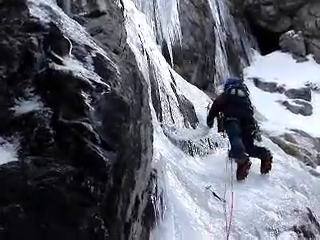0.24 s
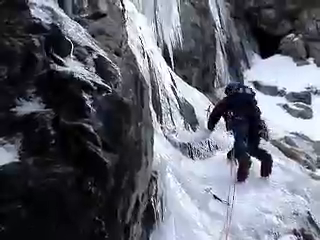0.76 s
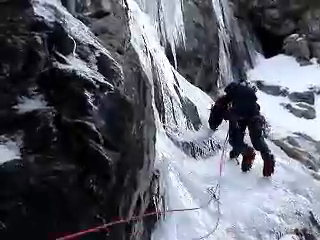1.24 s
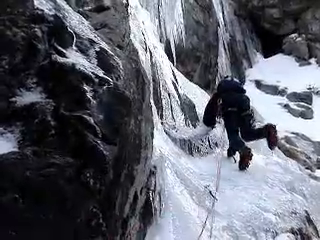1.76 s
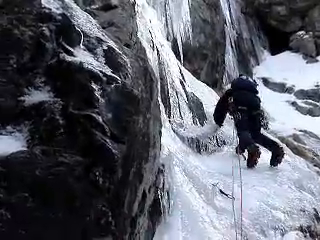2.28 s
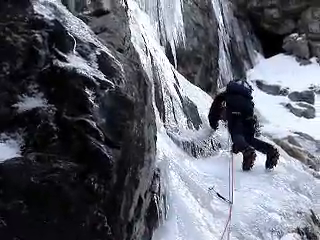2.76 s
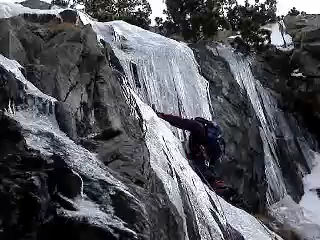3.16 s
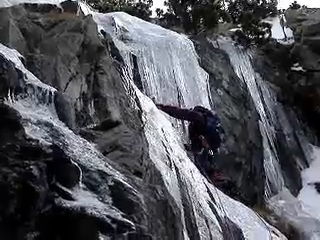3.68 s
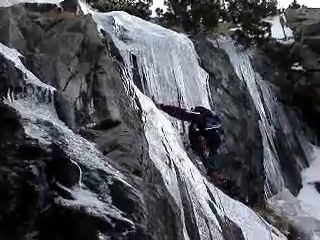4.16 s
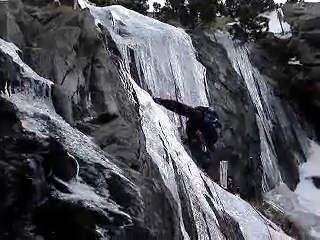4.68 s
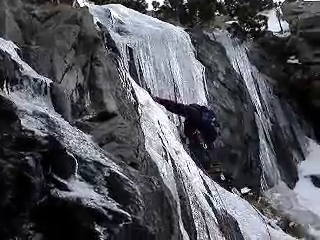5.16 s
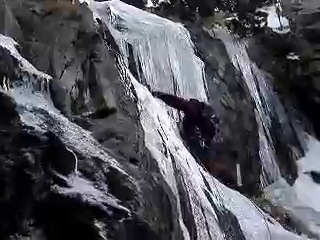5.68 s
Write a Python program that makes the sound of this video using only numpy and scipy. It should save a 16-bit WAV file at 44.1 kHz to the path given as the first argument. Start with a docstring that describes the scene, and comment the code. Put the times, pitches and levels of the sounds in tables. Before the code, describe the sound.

Picks and crampons crunch into hollow ice, then broken icicles tumble down in knocking chunks and a hiss of splinters.

```python
"""Ice climbing and falling icicles

A climber works up a frozen waterfall in a rocky gully: picks and crampons crunch into the ice,
the hollow sheet booms, gear clinks, something trickles softly and wind nudges the microphone.
The sound drops out briefly, then icicles tumble down the slope, bursting into knocking chunks and
a hissing slide of splinters. Each crunch is a swarm of tiny cracks, echoed by the rock walls."""
import sys
import numpy as np
from scipy import signal
from scipy.fft import rfft, irfft
from scipy.io import wavfile
from scipy.ndimage import uniform_filter1d

SR = 44100
rng = np.random.default_rng(int(sys.argv[2]) if len(sys.argv) > 2 else 0)


def persist_wave(psi):
    """Save psi, clipped to +-1, as 16-bit WAV."""
    counts = np.round(np.clip(psi, -1, 1) * 32767).astype(np.int16)
    wavfile.write(sys.argv[1], SR, np.atleast_2d(counts).T)


N = 261513

# Picks and crampons biting in. "Hollow" is the low note of the ice, "ring" its high note.
# (time [s], relative level [dB], brightness [dB], hollow [Hz], ring [Hz], crumbling time [s])
BLOWS = [(0.152, -12.5, -4.5, 380, 2880, 0.029), (0.231, -23.5, -6, 686, 2540, 0.033),
         (0.327, -48, 22.5, 450, 6000, 0.01), (0.546, -36, 12.5, 384, 4400, 0.0041),
         (0.645, -40, 6, 596, 5650, 0.012), (0.888, -32, -5, 385, 1600, 0.03),
         (1.119, -38, 2, 990, 4100, 0.031), (1.265, -22, -3.5, 376, 3200, 0.023),
         (1.511, -33.5, 0.5, 420, 2860, 0.043), (1.604, -43.5, 20.5, 423, 5540, 0.023),
         (1.783, -36.5, 16, 390, 5140, 0.0038), (1.865, -41, -16, 750, 1900, 0.028),
         (1.991, -30.5, -9, 1500, 2230, 0.031), (2.022, -20, 0, 338, 3050, 0.025),
         (2.23, -29, 6, 918, 3630, 0.028), (2.367, -32.5, -1.5, 960, 2490, 0.054),
         (2.564, -34.5, 14, 920, 4500, 0.0033), (2.682, -29, -2.5, 1430, 2150, 0.042),
         (2.768, -33.5, -3.5, 738, 2060, 0.033)]
# The tone of their crunch: (frequency [Hz], level [dB])
BLOW_TONE = [(59, -80), (100, -25), (330, 4.5), (467, -6.5), (600, 2), (1140, 4.5), (1810, 2.5),
             (2130, -3.5), (3040, -13.5), (3590, -6), (4610, -8), (12800, -25), (14500, -36)]
# The notes of a steel pick: (pitch [Hz], relative level [dB], time to fade by 60 dB [s])
PICK_NOTES = [(1900, -24, 0.27), (3060, -5, 0.14), (4020, -1, 0.22), (4670, 1, 0.15), (6140, -15, 0.098)]
# The low notes of the ice sheet; wider ones die sooner: (pitch [Hz], width [Hz], relative level [dB])
SHEET_NOTES = [(135.6, 21, 5.5), (160, 16.5, 6), (207, 20, 2.5), (333, 49, 9)]


def climbing_blows():
    """Steel points ring as they crush into the hollow ice sheet, which booms."""
    out, t = np.zeros(N), np.arange(SR // 2) / SR
    boom = sum(from_db(db) * np.sin(2 * np.pi * hz * t) * np.exp(-np.pi * width_hz * t)
               for hz, width_hz, db in SHEET_NOTES)
    boom *= 1 - np.exp(-t / 0.026)   # the whole sheet takes a moment to get moving
    for s, level_db, bright_db, hollow_hz, ring_hz, crumble_s in BLOWS:
        levels = band_levels("blow", level_db, bright_db, hollow_hz)
        thud_db, _, crack_db, _ = levels
        # harder blows crush the ice, so the first snap grows less than the crack
        crunch = shatter(levels, hollow_hz, ring_hz, crumble_s, BLOW_TONE, fade_s=0.14,
                         snap_db=0.54 * crack_db - 2.5, snaps_per_s=3700, spread_db=2,
                         hollow_db=3.5, ring_db=3.5, shard_db=-13, knock_db=-15, clink_db=2.5)
        steel = sum(ping(hz * rng.uniform(1, 1.015), crack_db + db - 4.5, fade_s)
                    for hz, db, fade_s in PICK_NOTES)
        add(out, s, crunch)
        add(out, s, steel)
        add(out, s + 0.011, from_db(thud_db + 3) * boom)
    return from_db(-6) * out


# Chunks breaking off and landing: (time [s], relative level [dB], brightness [dB],
# hollow [Hz], hollow level [dB], ring [Hz], ring level [dB], crumbling time [s])
FALLS = [(3.201, -34, 11.5, 1500, 19, 3340, -6, 0.038), (3.331, -20, -3, 1320, 12, 623, 10, 0.032),
         (3.41, -25.5, -3, 690, 18, 2280, 7, .022), (3.48, -28, -7, 1330, 18, 2480, 1, 0.017),
         (3.559, -26.5, -7, 1490, 13, 2400, 9, 0.028), (3.635, -23.5, 3, 1240, -7, 3280, 6, 0.021),
         (3.727, -24, 1, 895, 7, 3120, 14.5, 0.029), (3.799, -28.5, -1, 1200, -14, 2660, 6, 0.011),
         (3.936, -27.5, -4, 590, 15, 3500, 11, 0.043), (3.962, -26, -4.5, 870, 17, 3620, 8, 0.03),
         (4.038, -25, -3.5, 1180, 7, 2284, 12, 0.029), (4.051, -24.5, 4.5, 570, 7, 3430, 14.5, 0.04),
         (4.098, -24, 0.5, 1190, 19, 2160, 7, 0.063), (4.128, -22.5, -3, 1280, 19, 2200, 5, 0.056),
         (4.248, -26.5, -4, 600, 11, 1790, 5, 0.03), (4.409, -31.5, -13, 726, -13, 1070, 15, 0.027),
         (4.479, -25.5, -2, 1210, -5, 3180, 8, 0.018), (4.544, -39, 32, 1360, 6, 4390, 4, 0.013),
         (4.64, -27.5, -1, 1220, 4, 3430, 13, 0.045), (4.697, -22, -5, 980, 11, 1560, 9, 0.032),
         (4.76, -27, -9, 1290, -6, 2260, 6, .03), (4.801, -17, 2.5, 1770, 6, 2830, 0, 0.028),
         (4.862, -22.5, 5.5, 1330, -7, 4500, 7.5, 0.035), (4.904, -23.5, 4, 517, 6, 4120, 3, 0.047),
         (5.038, -24, -4, 1390, -2, 2960, 4, 0.033), (5.06, -19, 1.5, 496, 5, 1930, 2, 0.036),
         (5.137, -25, 3, 590, 2, 2580, 14, 0.04), (5.165, -20.5, -2.5, 423, -5, 2060, -5, 0.031),
         (5.179, -18.5, 6, 1090, 20, 3805, 11.5, 0.017), (5.238, -19.5, 13, 845, 11, 3680, 2, 0.0091),
         (5.255, -14, 1.5, 1490, 2, 3450, -4, 0.019), (5.337, -20.5, 2.5, 930, 1, 4350, 9, 0.014),
         (5.355, -21, 9.5, 970, 12, 4960, 5, 0.018), (5.5, -28.5, -2, 830, 4, 3020, 7, 0.033),
         (5.569, -23.5, 6, 900, 6, 4070, 9, .006), (5.601, -11, -6, 800, 17.5, 1430, 11, 0.015),
         (5.621, -21.5, 13, 800, -8, 2140, 4, 0.0087), (5.698, -14, 4.5, 850, 11, 4050, 0, 0.026),
         (5.82, -24.5, 6, 850, 12, 1670, 8, 0.0099)]
# The tone of their crunch: (frequency [Hz], level [dB])
FALL_TONE = [(59, -60), (100, -11), (134, -35), (175, -7), (255, -11), (308, -4), (693, -8.5), (786, -9),
             (1120, -8.5), (4070, -12), (8800, -15), (10400, -19), (14500, -14)]


def falling_ice():
    """Broken icicles burst on the slope; some ring hollow, others only crunch."""
    out = np.zeros(N)
    for s, level_db, bright_db, hollow_hz, hollow_db, ring_hz, ring_db, crumble_s in FALLS:
        levels = band_levels("fall", level_db, bright_db, hollow_hz)
        _, _, crack_db, _ = levels
        burst = shatter(levels, hollow_hz, ring_hz, crumble_s, FALL_TONE, fade_s=0.17,
                        snap_db=crack_db + 8.5, snaps_per_s=2400, spread_db=3, hollow_db=hollow_db,
                        ring_db=ring_db, shard_db=-9, knock_db=hollow_db - 4, clink_db=ring_db - 4)
        add(out, s, burst)
    return from_db(-5) * out


# The four bands of an impact, from low to high: thud, crunch, crack and spray.
# (level in a blow [dB], level in a fall [dB], gain from brightness [dB per dB])
IMPACT_BANDS = [(-7.5, -2.5, -0.68), (-4, 1, -0.3544), (-0.5, 0.5, 0.4037), (-3, -7.5, 0.7332)]
BIG_BLOCK_HZ, THUD_DB_PER_OCTAVE = 543, -6.5


def band_levels(kind, level_db, bright_db, hollow_hz):
    """Bright impacts favour the high bands; smaller blocks sound higher and thud less."""
    blow_db, fall_db, tilt = np.transpose(IMPACT_BANDS)
    levels = level_db + (blow_db if kind == "blow" else fall_db) + bright_db * tilt
    levels[0] += THUD_DB_PER_OCTAVE * np.log2(hollow_hz / BIG_BLOCK_HZ)
    return levels


# The borders of those four bands: (frequency [Hz])
BAND_EDGES_HZ = [60, 700, 2500, 6000, 15000]


def shatter(levels, hollow_hz, ring_hz, crumble_s, tone, fade_s, snap_db, snaps_per_s, spread_db,
            hollow_db, ring_db, shard_db, knock_db, clink_db):
    """Ice breaks with a snap, a knock, a clink and a swarm of tiny cracks that soon fades."""
    thud_db, _, crack_db, _ = levels
    t = np.arange(SR // 3) / SR
    size = len(t) + 1024   # extra samples let the filters settle
    cracks = tiny_snaps(size, snaps_per_s, spread_db)
    # the block rings hollow; its fragments collide, each at a pitch of its own
    block = from_db(hollow_db) * resonance(cracks, hollow_hz, 170)
    block += from_db(ring_db) * resonance(cracks, ring_hz, 400)
    pitches = np.geomspace(900, 9000, 14) * np.exp(rng.normal(0, 0.1196, size=14))
    shards = sum(resonance(tiny_snaps(size, 180, spread_db), hz, 49) for hz in pitches)
    swarm = shape_tone(unit_level(cracks + block) + from_db(shard_db) * unit_level(shards), tone)
    crumble = np.zeros(len(t))
    band_fades_s = fade_s * np.linspace(0.83, 0.7, len(levels))   # the thud outlasts the spray
    for low_hz, high_hz, db, band_fade_s in zip(BAND_EDGES_HZ, BAND_EDGES_HZ[1:], levels, band_fades_s):
        band = even_out(filtered(swarm, [low_hz, high_hz], "band", order=3), window=700)
        spurts_db = 0.96 * wander(196, len(t))   # coarse and fine pieces give way separately
        fade_db = -60 * np.maximum(t - crumble_s, 0) / band_fade_s
        crumble += from_db(db + spurts_db + fade_db) * band[-len(t):]
    first_push = 1 + 0.3 * np.exp(-t / 0.005)
    spreading = 1 - np.exp(-t / 0.00071)   # the cracks take a moment to spread
    snap = filtered(rng.standard_normal(len(t)) * np.exp(-t / 0.001), [700, 5500], "band")
    knock_shape = (1 - np.exp(-t / 0.0057)) * np.exp(-t / 0.0071)
    knock = from_db(thud_db + knock_db) * np.sin(2 * np.pi * hollow_hz * t) * knock_shape
    clink = from_db(crack_db + clink_db) * np.sin(2 * np.pi * ring_hz * t) * np.exp(-t / 0.0082)
    return crumble * first_push * spreading + with_peak(snap, snap_db) + knock + clink


# Hard lumps knocking: (time [s], peak level [dB], pitch [Hz])
KNOCKS = [(0.175, -14, 396), (1.513, -24.5, 420), (1.738, -24, 636), (2.029, -18, 224), (2.548, -29, 520),
          (2.685, -26, 700), (3.044, -22, 2000), (3.077, -18.5, 1780), (3.097, -16, 1770),
          (3.116, -7.5, 1830), (3.34, -8, 598), (3.862, -17, 382), (3.872, -14, 710), (4.007, -28, 770),
          (4.107, -20.5, 454), (4.128, -12, 1180), (4.266, -19, 557), (4.351, -16, 850), (4.42, -22.5, 463),
          (4.696, -21, 1050), (4.801, -6.5, 1230), (4.911, -17.5, 383), (5.008, -17, 640),
          (5.063, -16, 340), (5.079, -8, 1980), (5.147, -9, 2500), (5.166, -20, 435), (5.199, -19, 440),
          (5.238, -7, 820), (5.275, -21, 615), (5.427, -19.5, 790)]
# The notes of one lump: (multiple of its pitch [ratio], relative level [dB])
LUMP_NOTES = [(1, 0.5), (1.44, -6.5), (2.13, -3.5), (3.2, -14.5), (4.9, -32)]


def knocking_lumps():
    """A lump rings briefly with a few clashing notes, bounces once and sheds a little grit."""
    out, t = np.zeros(N), np.arange(SR // 8) / SR
    for s, peak_db, hz in KNOCKS:
        hits = np.zeros(len(t))
        hits[0] = rng.choice([-1, 1])
        bounce_s = 0.011 * rng.uniform(0.6, 1.4)
        hits[int(bounce_s * SR)] = from_db(-13)
        ring = np.zeros(len(t))
        for multiple, db in LUMP_NOTES:
            note_hz = hz * multiple * (1 + 0.075 * rng.standard_normal())
            fade_s = 18 / hz / np.sqrt(multiple)   # higher notes die sooner
            ring += rng.choice([-1, 1]) * ping(note_hz, db + 2 * rng.standard_normal(), fade_s)[:len(t)]
        knock = filtered(signal.fftconvolve(ring, hits)[:len(t)], hz / 2, "high", order=4)
        grit = unit_level(filtered(rng.standard_normal(len(t)), [700, 5000], "band"))
        knock += from_db(-20) * grit * np.exp(-t / 0.003)
        add(out, s, with_peak(knock, peak_db))
    return out


# Single sharp ticks: (time [s], relative level [dB], pitch [Hz], contact time [s])
TICKS = [(0.157, -4, 2900, 0.0015), (0.175, -10, 3000, 0.00087), (0.777, -23, 3400, .002),
         (1.267, -26, 2280, 0.00089), (1.337, -21, 1400, .001), (1.5142, -25.5, 3460, 0.00065),
         (1.604, -20, 6000, .0015), (1.624, -21, 5650, 0.0025), (1.783, -21, 4970, .002),
         (1.991, -17, 1940, 0.00054), (2.026, -14, 1680, .003), (2.028, -12.5, 2960, 0.002),
         (2.232, -12.5, 6160, .002), (2.369, -23.5, 3270, 0.0025), (2.684, -18, 2180, 0.0067),
         (3.113, -7, 3740, 0.00022), (3.1995, -14, 3130, 0.0011), (3.7274, -11.5, 2430, 0.0019),
         (3.7444, -11, 2900, 0.0016), (4.388, -17, 2970, .003), (4.606, -14.5, 1390, 0.00035),
         (4.699, -11, 1900, 0.0023), (4.807, -7, 2440, .001), (4.948, -17, 4590, .0005),
         (5.064, -6, 1850, 0.00069), (5.239, -16, 2200, 0.00069), (5.258, -7, 4100, .0005),
         (5.553, -10, 3370, 0.00054), (5.6021, -4, 1290, 0.00076), (5.609, -3, 820, 0.0013),
         (5.697, -8, 3600, 0.0015)]


def sharp_ticks():
    """A hard little contact rings briefly; the longer it grinds, the fuller it sounds."""
    out, t = np.zeros(N), np.arange(SR // 10) / SR
    for s, db, hz, contact_s in TICKS:
        fade = np.exp(-t / contact_s) + from_db(-18) * np.exp(-t / 0.006)
        grind = rng.standard_normal(len(t)) * fade
        tick = resonance(grind, hz, hz / 2.8) + from_db(-49) * filtered(grind, [500, 8000], "band")
        add(out, s, with_peak(tick, db - 0.5))
    return out


# Low thumps: (time [s], peak level [dB])
THUMPS = [(0.159, -22), (2.032, -30), (3.113, -28), (3.768, -34), (4.861, -27), (5.061, -25.5),
          (5.234, -28), (5.275, -26.5), (5.351, -27.5), (5.606, -25), (5.696, -26)]


def impact_thumps():
    """Dull low thumps come with the loud ice impacts."""
    out, t = np.zeros(N), np.arange(SR // 10) / SR
    thump = filtered(np.exp(-t / 0.00033), [25, 170], "band")
    for s, peak_db in THUMPS:
        add(out, s, with_peak(thump, peak_db))
    return out


# Icicle stubs chattering as they are hit: (time [s], level [dB], pitch [Hz])
ICICLE_CHATTER = [(3.479, -30, 2400), (3.49, -30, 3530), (3.858, -36, 3560), (4.036, -29, 2160),
                  (5.182, -26, 3750), (5.205, -26, 4110)]
# Steel gear clinking on the harness: (time [s], level [dB], pitch [Hz])
GEAR_CLINKS = [(1.472, -52.5, 7700), (1.77, -46, 5050), (1.85, -50, 5370), (1.955, -37, 5140),
               (2.086, -41, 5200), (2.138, -39.5, 9800)]


def rattles(rows, detune, sharpness, settle_s):
    """Small hard parts touch again and again as they settle, ringing four close notes."""
    out, t = np.zeros(N), np.arange(SR // 3) / SR
    for s, db, hz in rows:
        rattle = np.zeros(len(t))
        offsets = detune * np.linspace(-1, 1, 4) * rng.uniform(0.59, 1, 4)
        for note_hz in hz * (1 + offsets):
            touches = tiny_snaps(len(t), 260, 2.3) * np.exp(-t / settle_s)
            touches[0] = rng.choice([-1, 1])
            rattle += resonance(touches, note_hz, note_hz / sharpness)
        add(out, s, from_db(db) * rattle / np.std(rattle[t < 0.04]))
    return out


# A soft steady trickling hiss behind the climb, likely meltwater: (time [s], relative level [dB])
TRICKLE_FLOW = [(0.0, -40.5), (0.11, -49), (0.34, -49.5), (0.66, -45.5), (0.82, -39), (1.0, -48),
                (1.2, -45.5), (1.42, -46.5), (1.68, -44), (1.97, -40), (2.15, -35), (2.33, -42),
                (2.46, -43), (2.54, -40.5), (2.63, -44), (2.87, -41), (3.1, -43)]
# Ice splinters sliding during the collapse: (time [s], relative level [dB])
SLIDE_FLOW = [(3.17, -32.5), (3.27, -32.5), (3.45, -29.5), (3.61, -30.5), (3.7, -31), (3.9, -30.5),
              (4.13, -30.5), (4.22, -30), (4.35, -31), (4.55, -31), (4.82, -28.5), (5.02, -28), (5.24, -20),
              (5.39, -24.5), (5.56, -28), (5.75, -24.5), (5.92, -28)]
# The tone of each flow: (frequency [Hz], level [dB])
TRICKLE_TONE = [(24, -33), (40, -15), (80, -10), (102, -55), (155, -13.5), (665, -7), (851, -8),
                (1500, -10.5), (2120, -8.5), (5280, -7), (9540, -14), (12500, -17.5), (14500, -55)]
SLIDE_TONE = [(24, -53), (40, -35), (118, -26), (333, -9), (752, -4.5), (1360, -3.5), (1920, -3.5),
              (3300, 0.5), (6750, -3), (9540, -8.5), (10500, -9), (13500, -9), (14500, -43)]


def hissing_flow(flow, tone, low_db, high_db, tinkles_per_s, spread_db, tinkle_db, flicker_db):
    """Countless tiny clicks merge into a hiss while others tinkle; the lows and highs flicker."""
    flow_db = np.interp(np.arange(N) / SR, *np.transpose(flow))
    pitches = np.geomspace(500, 9500, 28)
    per_pitch = tinkles_per_s / len(pitches)
    tinkle = sum(resonance(tiny_snaps(N, per_pitch, spread_db), hz, hz / 22) for hz in pitches)
    hiss = tiny_snaps(N, 9000, 2.9)
    stream = shape_tone(unit_level(hiss) + from_db(tinkle_db) * unit_level(tinkle), tone)
    lows = unit_level(filtered(stream, 2000, "low", order=3))
    lows *= from_db(low_db + flicker_db * wander(45))
    highs = unit_level(filtered(stream, 2000, "high", order=3))
    highs *= from_db(high_db + flicker_db * wander(45))
    return from_db(flow_db) * (lows + highs)


def gully_echo(x, low_db, high_db, low_fade_s, high_fade_s):
    """Rough rock walls scatter sound back unevenly; the air dulls it and the lows last longest."""
    out, t = np.zeros(N), np.arange(SR) / SR
    build_up = 1 - np.exp(-t / 0.0061)
    for band_hz, db, fade_s in [([120, 800], low_db, low_fade_s), ([800, 6000], high_db, high_fade_s)]:
        echoes = rng.standard_normal(len(t)) * build_up * from_db(2.7 * wander(44.7, len(t)))
        tail = unit_level(echoes * from_db(-60 * t / fade_s)) / np.sqrt(len(t))
        out += from_db(db) * signal.fftconvolve(x, filtered(tail, band_hz, "band"))[:N]
    return out


# Gusts on the microphone: (time [s], relative level [dB], hold time [s])
GUSTS = [(0.04, -47, 0.022), (0.187, -42, 0.094), (0.837, -37, 0.016), (1.026, -53, 0.011),
         (1.326, -37.5, 0.07), (1.416, -43, 0.014), (1.58, -33.5, 0.013), (1.62, -30, 0.0067),
         (1.712, -44, .015), (1.754, -39, 0.032), (1.805, -35, .008), (1.87, -42, .006)]
GUST_RISE_DB_PER_S, GUST_FALL_DB_PER_S, BREEZE_ENDS_S = 1800, 1300, 1.6


def wind():
    """Wind rumbles faintly on the microphone, with brief low gusts."""
    t = np.arange(N) / SR
    strength = from_db(-70) + from_db(-66.5) * (t < BREEZE_ENDS_S)   # calm air plus an early breeze
    for s, db, hold_s in GUSTS:
        rise_db = GUST_RISE_DB_PER_S * np.maximum(s - t, 0)
        fall_db = GUST_FALL_DB_PER_S * np.maximum(t - s - hold_s, 0)
        strength += from_db(db - rise_db - fall_db)
    swirls = even_out(filtered(rng.standard_normal(N), [40, 130], "band"), window=1500)
    return filtered(strength * swirls, 124, "low", order=3)


def tiny_snaps(size, per_s, spread_db):
    """Clicks at random moments; spread_db sets how much their strengths vary."""
    strength = from_db(spread_db * np.minimum(rng.exponential(1, size), 4))
    return (rng.random(size) < per_s / SR) * strength * rng.choice([-1, 1], size)


def ping(hz, db, fade_s):
    """One struck note, dying away by 60 dB in fade_s."""
    t = np.arange(SR // 3) / SR
    return from_db(db - 60 * t / fade_s) * np.sin(2 * np.pi * hz * t)


def resonance(x, hz, width_hz):
    """Make a sound ring at one pitch; a narrower width rings longer."""
    r = np.exp(-np.pi * width_hz / SR)
    feedback = [1, -2 * r * np.cos(2 * np.pi * hz / SR), r * r]
    return signal.lfilter(np.array([1, 0, -1]) * (1 - r * r) / 2, feedback, x + 1e-18)


def filtered(x, hz, kind, order=2):
    """Keep the lows, the highs or a band in between."""
    return signal.sosfilt(signal.butter(order, hz, kind, fs=SR, output="sos"), x)


def shape_tone(x, tone):
    """Turn each frequency up or down along a tone curve."""
    hz, db = np.transpose(tone)
    bins_hz = np.fft.rfftfreq(len(x), 1 / SR) + 1
    gain = from_db(np.interp(np.log(bins_hz), np.log(hz), db))
    return irfft(rfft(x) * gain, len(x))


def wander(per_s, size=N):
    """A curve that glides to a new random value per_s times a second."""
    points = rng.standard_normal(2048)
    return np.interp(np.arange(size) / SR * per_s, np.arange(len(points)), points)


def from_db(db):
    """Turn decibels into a multiplier."""
    return 10 ** (np.asarray(db) / 20)


def unit_level(x):
    """Scale a sound to an average (rms) level of 1."""
    return x / np.sqrt(np.mean(x ** 2) + 1e-20)


def even_out(x, window):
    """Hold the level near 1, averaged over a sliding window of samples."""
    return x / np.sqrt(uniform_filter1d(x ** 2, size=window) + 1e-12)


def with_peak(x, db):
    """Scale a sound so that its peak sits at db."""
    return from_db(db) * x / np.abs(x).max()


def add(out, s, sound):
    """Mix a sound in, starting at s seconds."""
    at = round(s * SR)
    out[at:at + len(sound)] += sound[:max(N - at, 0)]


DROPOUT_START_S, DROPOUT_END_S, DROPOUT_DB = 3.128, 3.167, -50


def scene():
    """The climb, a brief dropout, then the collapse; both channels are the same."""
    t = np.arange(N) / SR
    blows = climbing_blows()
    chunks = falling_ice() + rattles(ICICLE_CHATTER, detune=0.027, sharpness=24, settle_s=0.03)
    gear = rattles(GEAR_CLINKS, detune=0.056, sharpness=80, settle_s=0.055)
    climb = blows + gear + gully_echo(blows, low_db=-5, high_db=-9, low_fade_s=1, high_fade_s=0.66)
    climb += hissing_flow(TRICKLE_FLOW, TRICKLE_TONE, low_db=-3.5, high_db=-1.5,
                          tinkles_per_s=3700, spread_db=5, tinkle_db=-6, flicker_db=3)
    collapse = chunks + gully_echo(chunks, low_db=-4.5, high_db=-10.5, low_fade_s=0.75, high_fade_s=0.12)
    collapse += hissing_flow(SLIDE_FLOW, SLIDE_TONE, low_db=-4.5, high_db=-2.5,
                             tinkles_per_s=1100, spread_db=-0.5, tinkle_db=-5.5, flicker_db=2.5)
    mix = np.where(t < DROPOUT_START_S, climb, collapse)
    mix += sharp_ticks() + knocking_lumps() + impact_thumps() + wind()
    dropout = (t > DROPOUT_START_S) & (t < DROPOUT_END_S)
    mix *= from_db(DROPOUT_DB * uniform_filter1d(dropout.astype(float), size=64))
    return np.array([mix, mix])


def record(dry):
    """Soften the treble above 10 kHz, round off the loudest peaks and cut everything above 14.2 kHz."""
    treble_gain = from_db(-8)
    below_treble = signal.sosfiltfilt(signal.butter(16, 10000, fs=SR, output="sos"), dry)
    dull = treble_gain * dry + (1 - treble_gain) * below_treble
    rounded = dull / (1 + (dull / 1.05) ** 4) ** 0.25
    return signal.sosfilt(signal.ellip(10, 0.2, 90, 14200, fs=SR, output="sos"), rounded)


dry = scene()
out = record(dry)
persist_wave(out)
```